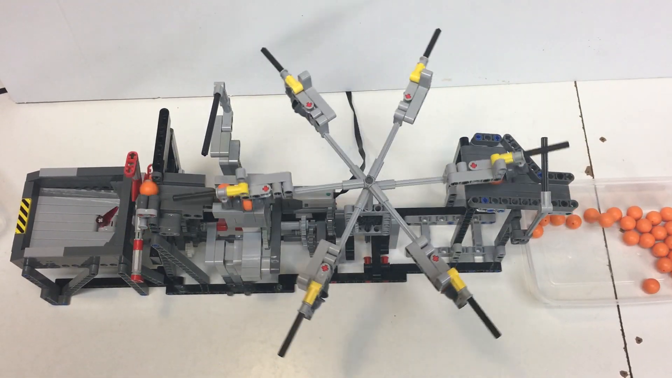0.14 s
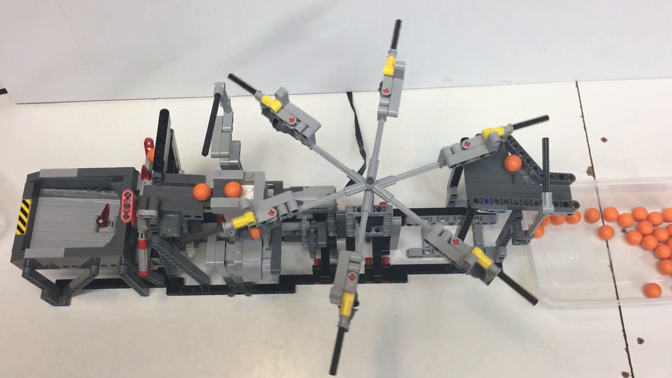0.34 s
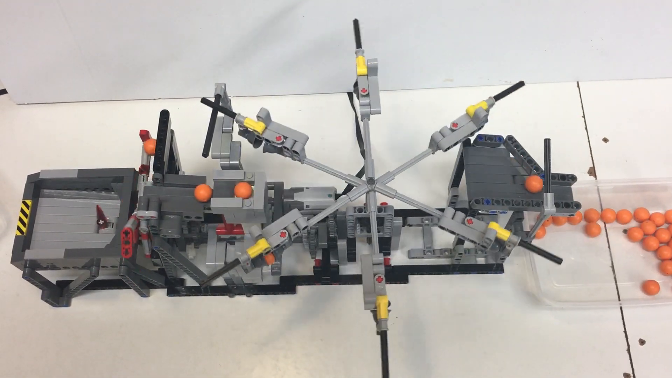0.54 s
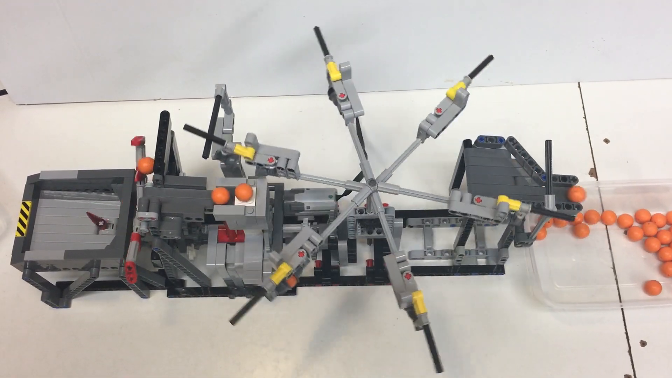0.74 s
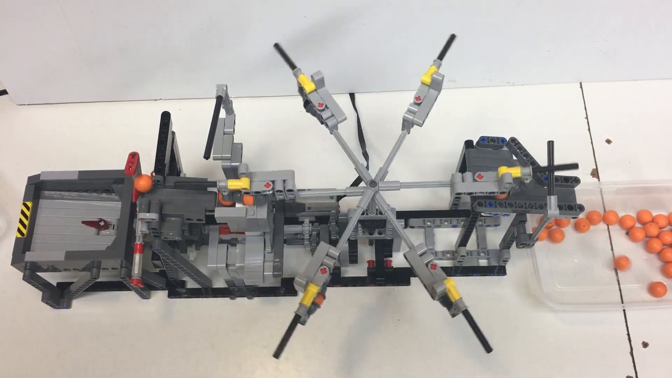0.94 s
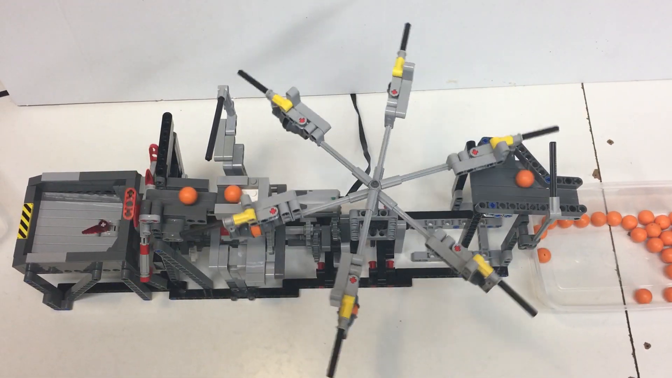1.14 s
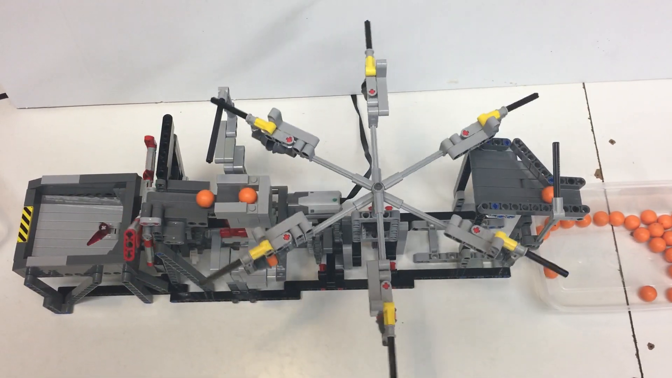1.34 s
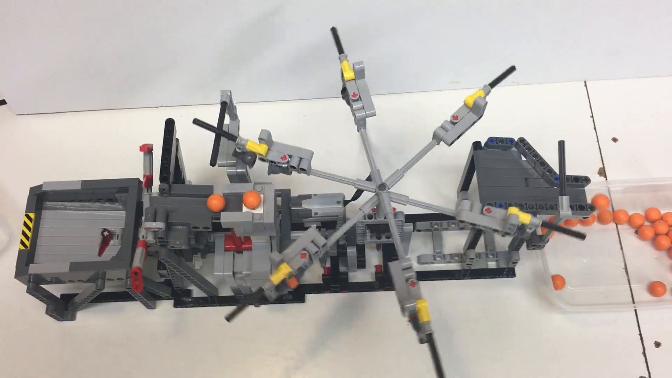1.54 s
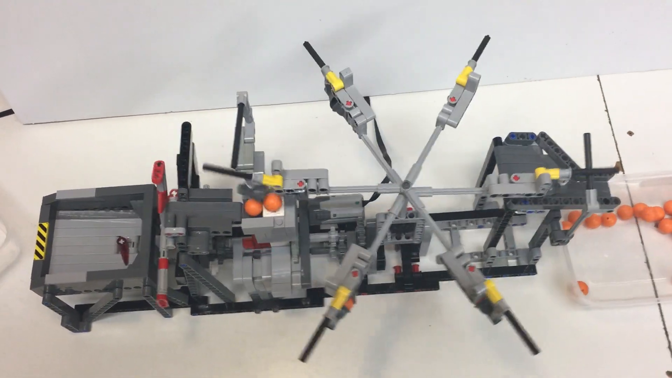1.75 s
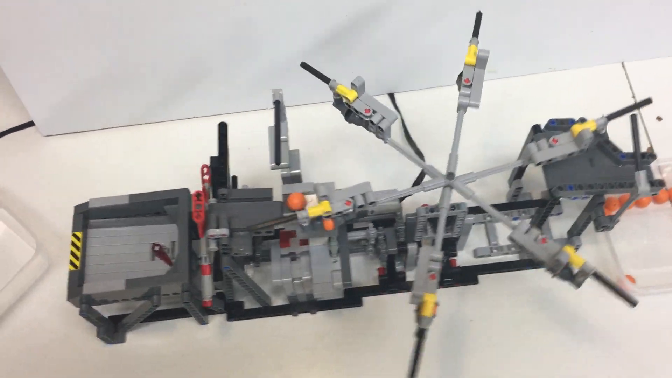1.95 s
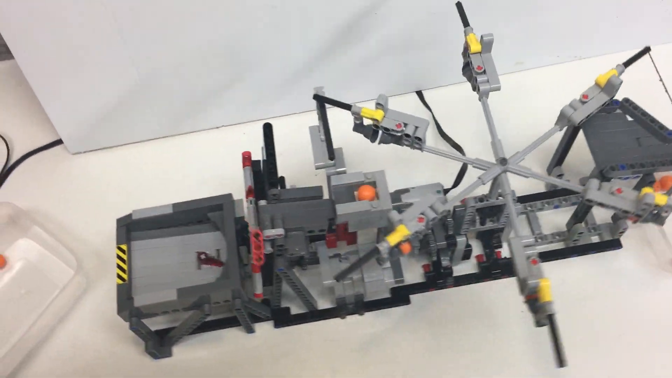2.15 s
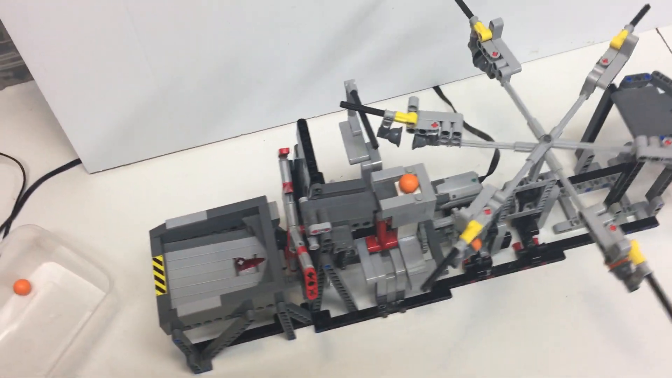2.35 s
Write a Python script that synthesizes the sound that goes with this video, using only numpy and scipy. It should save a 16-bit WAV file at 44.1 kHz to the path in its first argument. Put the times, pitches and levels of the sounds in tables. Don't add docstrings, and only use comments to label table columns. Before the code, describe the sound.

A plastic brick machine whirrs and ticks on a table in a small hard room; three sharp lever snaps each set off clattering ball knocks in a hollow chute, picked up close by a phone microphone.

```python
import sys
import numpy as np
from scipy import signal
from scipy.fft import rfft, irfft
from scipy.io import wavfile
from scipy.ndimage import uniform_filter1d

SR = 44100
rng = np.random.default_rng(int(sys.argv[2]) if len(sys.argv) > 2 else 0)


def gain_from_db(level_db):
    decades = np.asarray(level_db, float) / 20
    return 10 ** decades


def int16_out(signal):
    q = np.round(np.clip(np.atleast_2d(signal).T, -1, 1) * 32767)
    wavfile.write(sys.argv[1], SR, q.astype(np.int16))


N = 110250


def evened(x):
    return x / np.sqrt(np.mean(x ** 2) + 1e-20)


def peaked(x, db):
    return gain_from_db(db) * x / np.abs(x).max()


def read(points, hz):
    f, value = np.transpose(points)
    return np.interp(np.log(hz + 1), np.log(f + 1), value)


def add(mix, start_s, sound):
    part = mix[round(start_s * SR):][:len(sound)]
    part += sound[:len(part)]


# (centre [Hz], width [Hz], level [dB])
MIC_NOTCHES = [(607, 150, -6), (2810, 230, -15), (7660, 220, -8), (181.4, 9.4, -26), (794, 29, -11)]


def coloured(x, spectrum, notched=0):
    hz = np.fft.rfftfreq(len(x), 1 / SR)
    notches_db = sum(db * np.exp(-((hz - f) / width) ** 2) for f, width, db in MIC_NOTCHES)
    gain = gain_from_db(read(spectrum, hz) + notched * notches_db)
    return evened(irfft(rfft(x) * gain, len(x)))


CONTACT_S = 0.000067


def ring(modes, rise_s=3e-5):
    t = np.arange(4410) / SR
    total = 0
    for k, (hz, db, t60) in enumerate(modes):
        decay = gain_from_db(db - 60 * t / np.clip(t60, 0.003, 0.09))
        total = total + (-1) ** k * decay * np.sin(2 * np.pi * min(hz, 16000) * t)
    return (1 - np.exp(-t / rise_s)) * total


# (frequency [Hz], density [dB per Hz])
VENTILATION = [(12, -40), (20, -30), (59, -3.5), (201, -11), (251, -14.5), (435, -17.5), (669, -18.5),
               (700, -16), (910, -56), (1540, -120)]
# (start [s], end [s], from [Hz], to [Hz], level [dB])
HUM_NOTES = [
    (-0.54, 0.43, 123, 123, -59.5),
    (0.448, 1.3, 152, 143, -63),
    (1.22, 1.55, 143, 140, -58.5),
    (1.46, 1.52, 60.7, 58, -66),
    (2.101, 3.1, 75, 61, -69),
    (.03, .3, 212, 212.5, -64),
    (1.55, 1.89, 105, 109.3, -63),
]


def rumble():
    t = np.arange(N) / SR
    out = gain_from_db(-58.5) * coloured(rng.standard_normal(N), VENTILATION, 1)
    for start, end, hz0, hz1, db in HUM_NOTES:
        fade = np.clip(np.minimum(t - start, end - t) / 0.038, 0, 1)
        phase = 2 * np.pi * np.cumsum(np.interp(t, [start, end], [hz0, hz1])) / SR
        out += gain_from_db(db + 2.5) * fade * np.sin(phase)
    return out


def patchy(x):
    z = signal.stft(x, nperseg=256)[2]
    patches = uniform_filter1d(rng.standard_normal(z.shape), 6, axis=0)
    patches = evened(uniform_filter1d(patches, 25, axis=1))
    return evened(signal.istft(z * gain_from_db(1.5 * patches), nperseg=256)[1][:len(x)])


# (frequency [Hz], width [Hz], level [dB])
CASE_MODES = [(2000, 270, -6), (2210, 170, -6), (3732, 83, 8), (3870, 96, -7), (4630, 470, 8.5),
              (5710, 97, 3), (8500, 570, 4.5), (12300, 400, -6.5)]
# (frequency [Hz], density [dB per Hz])
WHIRR_HISS = [(290, -26), (500, -13.5), (1980, -2.5), (2890, 0.5), (3750, -4), (5800, -0.5), (10200, -10.5),
              (12500, -6), (16000, -12)]
# (time [s], motor level [dB], tooth ring [dB])
MOTOR_COURSE = [
    (0, -43.5, 2),
    (.6, -43, 3),
    (1.2, -43, 1.5),
    (1.8, -43.5, 1.5),
    (2.1, -43.5, 0.5),
    (2.5, -42.5, -19),
]


def motor():
    teeth_per_s, spread_db, narrowest_hz = 1900, 2, 85
    t = np.arange(2000) / SR
    struck = rng.random(N) < teeth_per_s / SR
    size = gain_from_db(spread_db * np.minimum(rng.exponential(1, N), 4)) * struck
    mode = rng.integers(0, len(CASE_MODES), N)
    teeth = np.zeros(N)
    for k, (hz, width, db) in enumerate(CASE_MODES):
        decay = np.exp(-np.pi * max(width, narrowest_hz) * t)
        tone = gain_from_db(db) * np.sqrt(width) * decay * np.sin(2 * np.pi * hz * t)
        teeth += signal.oaconvolve(size * (mode == k), tone)[:N]
    teeth = coloured(teeth, [(100, 0), (200, 0)], 1)
    flutter = gain_from_db(1.76 * evened(uniform_filter1d(rng.standard_normal(N), 200)))
    hiss = patchy(coloured(rng.standard_normal(N) * flutter, WHIRR_HISS, 1))
    s, *columns = np.transpose(MOTOR_COURSE)
    level_db, ring_db = (np.interp(np.arange(N) / SR, s, column) for column in columns)
    return gain_from_db(level_db) * (gain_from_db(-7 + ring_db) * teeth + gain_from_db(-2.5) * hiss)


# (frequency [Hz], width [Hz], level [dB], share of tooth ring [ratio])
MESH_TONES = [(861, 12, -68, 0.084), (2420, 33, -70, 0.3), (3710, 21, -62.5, 1.3), (3890, 30, -71, 0.99)]


def whine():
    t = np.arange(N) / SR
    ring_db = np.interp(t, *np.transpose(MOTOR_COURSE)[::2])
    out = np.zeros(N)
    for hz, width, db, share in MESH_TONES:
        noise = rng.standard_normal(N) + 1j * rng.standard_normal(N)
        waver = signal.lfilter([1], [1, -np.exp(-np.pi * width / SR)], noise)
        out += gain_from_db(db + share * ring_db) * evened((np.exp(2j * np.pi * hz * t) * waver).real)
    return out


# (frequency [Hz], level [dB], t60 [s])
FRAME_MODES = [(425, 0, 0.065), (633, -11, 0.064), (890, -5.5, 0.054), (992, 0, 0.053)]
# (frequency [Hz], t60 [s])
FRAME_THUMP = (223, 0.062)
# (time [s], level [dB], thump level [dB])
CAM_NUDGES = [
    (.05, -47.5, -20),
    (.560, -45, -14),
    (.768, -43, -26),
    (1.146, -33, 2),
    (1.268, -41, -2),
    (1.626, -47.5, -12),
    (2.472, -43, -20),
]


def cams():
    out = np.zeros(N)
    thump_hz, thump_t60 = FRAME_THUMP
    for s, db, thump_db in CAM_NUDGES:
        push = ring(FRAME_MODES + [(thump_hz, thump_db, thump_t60)], rise_s=0.005)
        add(out, s, peaked(push, db))
    return out


# (time [s], level [dB], pitch [Hz], crackle [dB])
GEAR_TICKS = [(0.0249, -30.5, 4700, -4.5), (0.0452, -29, 4650, -2), (.199, -22.5, 4430, -7),
              (.2822, -31, 3760, -22), (0.319, -27, 3870, -28), (0.492, -22, 4010, -18),
              (.5665, -34.5, 3780, 2), (.6403, -34, 4830, -12), (0.6612, -27.5, 3900, -11),
              (.7280, -26.5, 4800, -8.5), (0.8333, -26, 3870, -20), (0.8908, -22.5, 4800, -5.5),
              (1.095, -27, 2390, -6), (1.26, -24.5, 5380, -3), (1.324, -27, 4930, -1.5),
              (1.3469, -29, 3680, -7), (1.5166, -27.5, 3817, -19), (1.74, -27, 4740, -14),
              (1.858, -36, 4480, 1), (2.0797, -34, 4630, -14), (2.112, -26, 6150, -5),
              (2.2, -32, 3980, -6.5), (2.2616, -33, 4100, -2), (2.37, -28, 5940, -9.5),
              (1.637, -29, 5350, -20), (2.028, -30, 3870, -12), (.1180, -35, 4900, -5),
               (.1455, -31, 3800, -17), (.1835, -32, 8950, -8), (1.4470, -34, 4700, -10),
               (1.6870, -35, 5900, -7), (2.0935, -35.5, 4220, -4), (2.4345, -36, 4400, -5),
               (2.4770, -34, 5260, 0.5)]


def linkage():
    out, t = np.zeros(N), np.arange(900) / SR
    for s, db, hz, crackle_db in GEAR_TICKS:
        spectrum = [(20, -60), (0.16 * hz, -20), (hz, 0), (1.9 * hz, -8), (22000, -25)]
        crackle = coloured(rng.standard_normal(len(t)), spectrum)
        crackle *= gain_from_db(-0.5 + crackle_db - 60 * t / 0.02)
        tone = ring([(hz, -3, 0.016)])[:len(t)]
        add(out, s, gain_from_db(db) * (crackle + tone) * np.minimum(t / 0.00063, 1))
    return out


# (frequency [Hz], density [dB per Hz])
CONTACT_NOISE = [(1500, -17), (3500, 6), (9000, 1), (16000, -11.5)]


def crack(t60):
    t = np.arange(4410) / SR
    return gain_from_db(-60 * t / t60) * coloured(rng.standard_normal(len(t)), CONTACT_NOISE)


# (frequency [Hz], level [dB], t60 [s])
CHUTE_MODES = [(241, -25, 0.098), (411.5, -22, 0.06), (1045, -15, 0.064), (1354, -8.5, 0.03),
               (1874, -14.5, 0.047), (2374, -11.5, 0.019), (2894, -8, 0.032)]
# (frequency [Hz], density [dB per Hz])
LOOSE_BRICKS = [(88, -30), (150, -0.5), (589, -7), (2270, 5), (4080, -7), (5910, -6), (10400, -16.5),
                (12900, -13.5), (16000, -22)]


def shudder(t60):
    t = np.arange(6000) / SR
    emphasis = 0.6 + 1.0 * (rng.random(len(t)) < 0.03)
    impacts = rng.standard_normal(len(t)) * emphasis
    grains = impacts * gain_from_db(2.0 * evened(uniform_filter1d(rng.standard_normal(len(t)), 90)))
    rung = evened(signal.fftconvolve(grains, ring(CHUTE_MODES, CONTACT_S))[:len(t)])
    chatter = coloured(grains, LOOSE_BRICKS, 0.25) + gain_from_db(-18) * rung
    return chatter * np.minimum(t / 0.001, 1) * gain_from_db(-60 * t / t60)


# (time [s], level [dB], pitch [Hz], brightness [dB], shudder [dB])
HARD_BOUNCES = [(.2490, -20, 1440, -4, -18), (0.2973, -17.5, 2200, 0, -17.5),
                (0.3460, -10, 2316, -7.5, -20), (0.3921, -17, 2090, -9.5, -17),
                (0.4375, -19.5, 2280, -2, -30), (0.4397, -17, 2670, -5, -20),
                (0.4764, -23, 1840, -1, -14.5), (1.0193, -12, 2270, -6, -19.5),
                (1.0560, -24, 1200, -13, -9.5), (1.1187, -15.5, 2700, -4, -14), (1.142, -19, 2480, -7, -9),
                (1.1848, -15.5, 2510, -10.5, -18), (1.8023, -20.5, 2620, -8, -22),
                (1.9127, -23.5, 2190, -3, -8), (1.9218, -14.5, 2010, -2.5, -15),
                (1.9875, -15, 2590, -17, -21), (2.0200, -32, 2300, -2, -4)]
# (time
# [s], level [dB], pitch # [Hz], brightness [dB])
FURTHER_KNOCKS = [(0.258, -19, 3820, 1), (0.3308, -29, 2460, -10), (0.366, -23, 2000, -8),
                  (0.377, -24, 1900, -12), (0.405, -33, 2000, -5), (0.4675, -30, 2070, -12),
                  (.135, -34, 1490, -25), (0.691, -33.5, 1190, -30), (0.769, -33, 1600, -20),
                  (1.0710, -22.5, 2000, -7), (1.1155, -19, 3600, 2), (1.133, -21, 2370, -23),
                  (1.1767, -25.5, 3460, 3), (1.2286, -25.5, 1680, -10), (1.268, -23, 2240, -2),
                  (1.626, -29, 1960, -4.5), (1.9438, -27, 2760, -11), (1.9540, -27, 2200, 8),
                  (1.984, -22, 2040, 7), (1.4956, -37, 1860, -11), (.6430, -42, 1940, -23),
                  (.2126, -11, 2350, -11), (.2468, -26, 1690, -9), (.3490, -19.5, 2320, -5),
                  (.3838, -29, 1900, -14), (0.3945, -15.5, 2160, -7), (0.4734, -24.5, 2320, -7),
                  (1.0205, -13, 2000, -2), (1.0440, -23, 2500, -3), (1.1278, -24, 2000, -18),
                  (1.1480, -29, 1700, -6), (1.3010, -30, 2220, -20), (1.9885, -23, 1450, -15),
                  (0.3477, -22.5, 1420, -13), (1.1865, -21.5, 1420, -15), (1.0059, -11, 2920, 1.5),
                  (0.0454, -32.5, 2000, -1), (1.323, -26, 2240, -2), (2.3687, -35.5, 1900, -2),
                  (.8330, -35, 3870, 0), (1.7660, -14.5, 2100, -9), (1.7718, -27, 2970, -10),
                  (1.9243, -20, 1300, -9.5), (1.9400, -32, 2500, -5)]


def balls():
    out = np.zeros(N)
    for s, db, hz, bright_db, shudder_db in HARD_BOUNCES + [(*tap, -18.5) for tap in FURTHER_KNOCKS]:
        modes = [(f * rng.uniform(0.92, 1.08), g + rng.uniform(-5, 3), t60) for f, g, t60 in CHUTE_MODES]
        knock = peaked(ring([(hz, 0, 0.004)], rise_s=0.00032), 0)
        shell = ring([(hz * 2.4, bright_db - 3, 0.007)]) + gain_from_db(bright_db - 2) * crack(0.009)
        add(out, s, peaked(knock + gain_from_db(-4) * ring(modes, CONTACT_S) + shell, db))
        add(out, s, gain_from_db(db + shudder_db) * shudder(0.11))
    return out


# (frequency [Hz], level [dB], t60 [s])
LEVER_BODY = [(251, -14, 0.095), (367, 1, 0.056), (558, -6, 0.082), (720, -5.5, 0.057), (1135, 8.5, 0.031),
              (1368, 12, 0.027), (1737, -9, 0.046), (1962, 9, 0.029), (2210, -15, 0.024),
              (2670, -2.5, 0.068), (3180, 4.5, 0.027), (3650, -8, 0.0095), (4250, -1, 0.018)]
# (frequency [Hz], level [dB], t60 [s])
TIP_MODES = [(3900, -26, 0.0049), (5310, 0, 0.0078), (6900, 4, 0.0041), (8800, -2.5, 0.0067),
             (12000, 3, 0.0033)]
# (time [s], level [dB], brightness [dB], rebound [dB], shudder [dB])
LEVER_SNAPS = [
    (0.2081, -5, 1.5, -10, -18.5),
    (1.006, -5.5, -1, -25, -20.5),
    (1.7614, -5, 5, -12.5, -19),
]


def lever():
    out = np.zeros(N)
    body = peaked(ring(LEVER_BODY, CONTACT_S), -7.5)
    for s, db, bright_db, rebound_db, shudder_db in LEVER_SNAPS:
        tip = peaked(ring(TIP_MODES) + gain_from_db(-11) * crack(0.015), bright_db - 6.5)
        add(out, s, gain_from_db(db) * (body + tip))
        add(out, s + 0.0045, gain_from_db(db + rebound_db) * (body + 0.52 * tip))
        add(out, s, gain_from_db(db + shudder_db) * shudder(0.14))
    return out


# (frequency [Hz], t60 [s])
ROOM_DECAY = [(300, 0.68), (2000, 0.27), (12000, 0.11)]


def room(x):
    first_wall_s, spacing = 0.012, 20
    echoes = np.zeros(SR // 2)
    at = np.arange(round(first_wall_s * SR), len(echoes) - spacing, spacing)
    at = at + rng.integers(0, spacing, len(at))
    echoes[at] = rng.choice([-1., 1.], len(at))
    hz, t, z = signal.stft(echoes, SR, nperseg=256)
    decay = gain_from_db(-60 * t / read(ROOM_DECAY, hz)[:, None])
    tail = signal.istft(z * decay, SR, nperseg=256)[1]
    return signal.fftconvolve(x, tail / np.linalg.norm(tail))[:N]


def scene():
    low_cut = signal.butter(3, 202, "high", fs=SR, output="sos")
    hits = signal.sosfilt(low_cut, linkage() + balls() + lever())
    mix = rumble() + motor() + whine() + cams() + hits + gain_from_db(-17.5) * room(hits)
    return mix[None]


def band_limit(x):
    return signal.sosfilt(signal.butter(12, 16810, fs=SR, output="sos"), x)


def record(dry):
    treble_limit = signal.firwin(511, 15800, window=("kaiser", 7), fs=SR)
    mix = signal.oaconvolve(dry, treble_limit[None], "same")
    return band_limit(mix)


dry = scene()
out = record(dry)
int16_out(out)
```